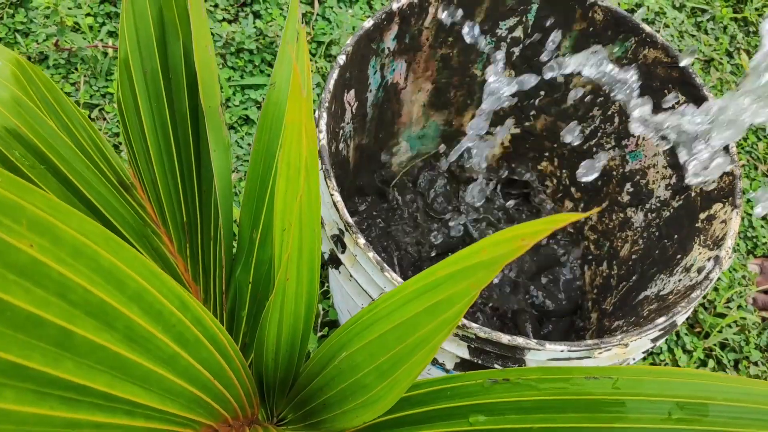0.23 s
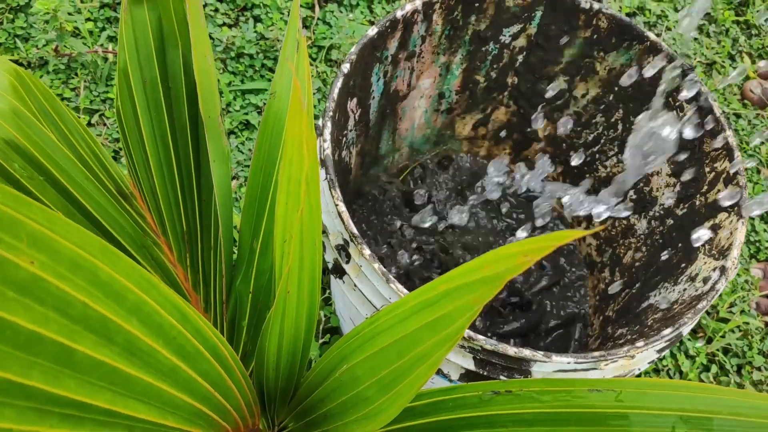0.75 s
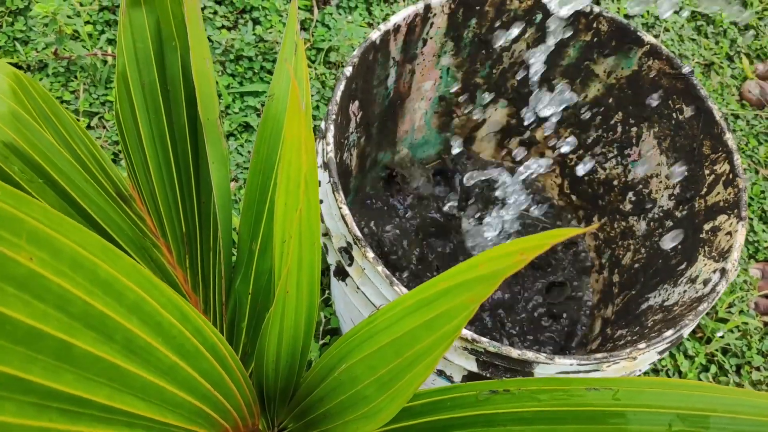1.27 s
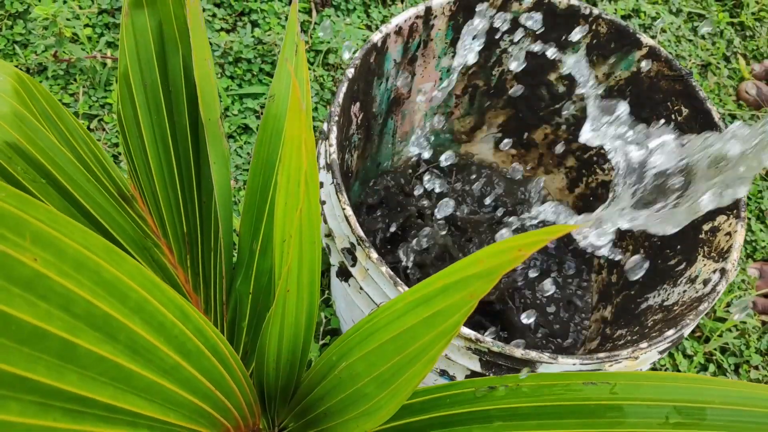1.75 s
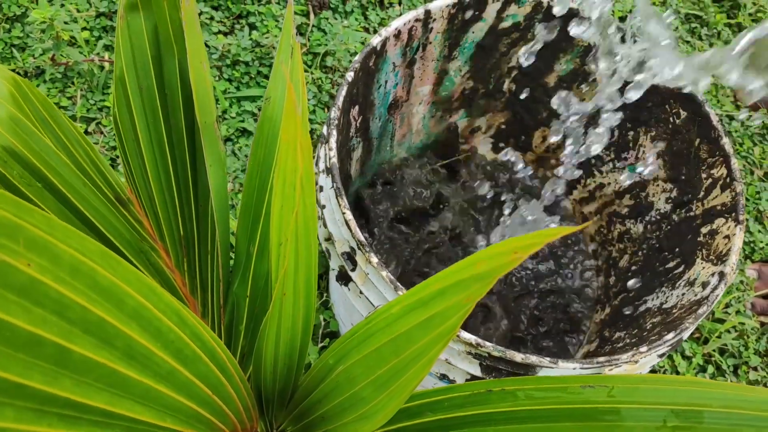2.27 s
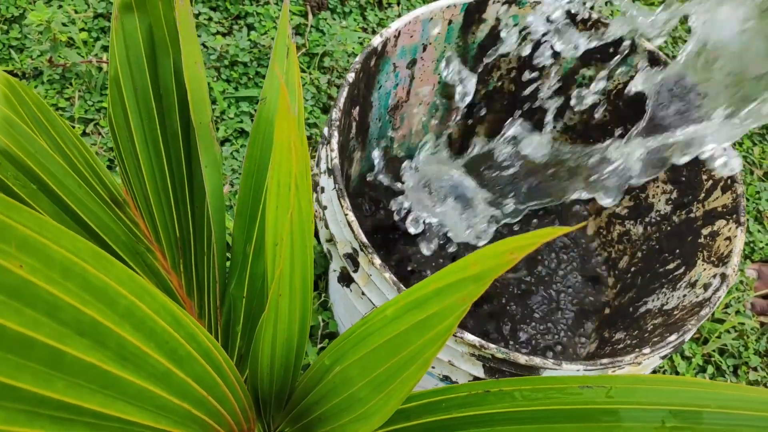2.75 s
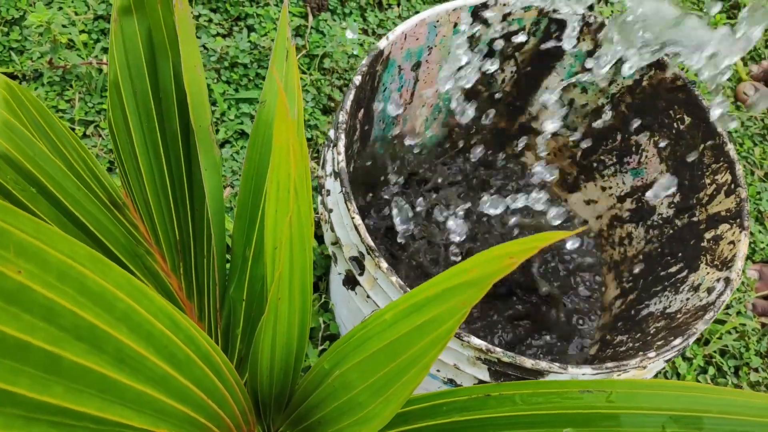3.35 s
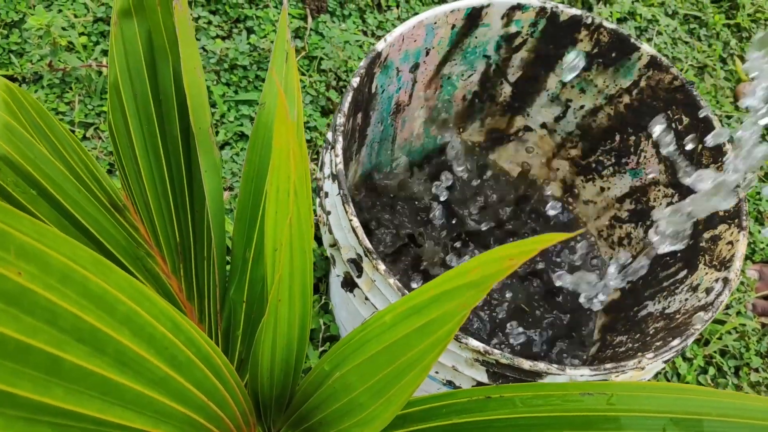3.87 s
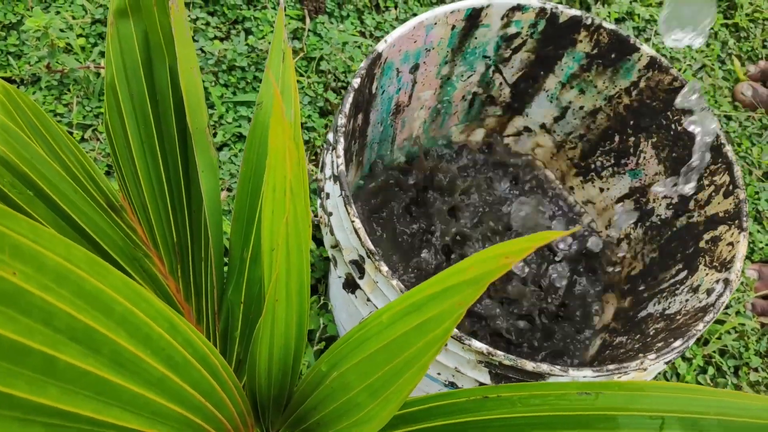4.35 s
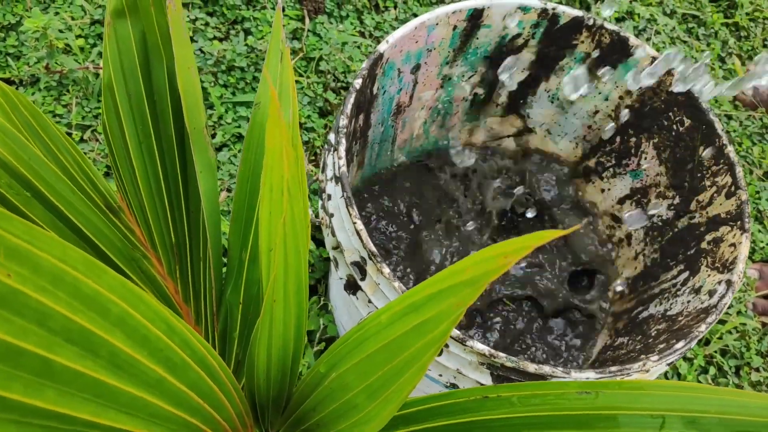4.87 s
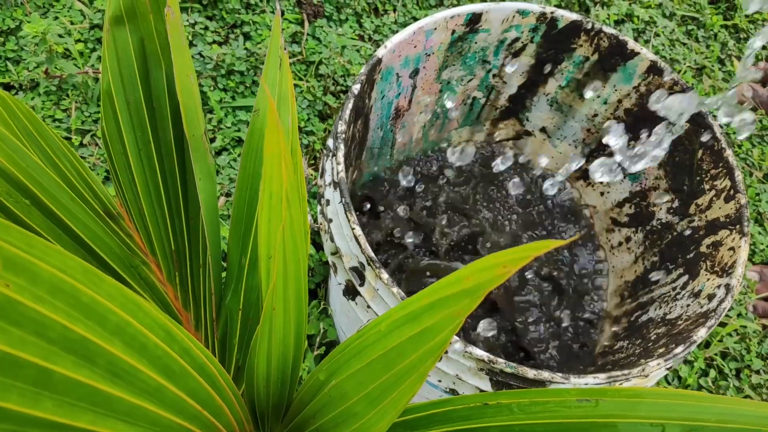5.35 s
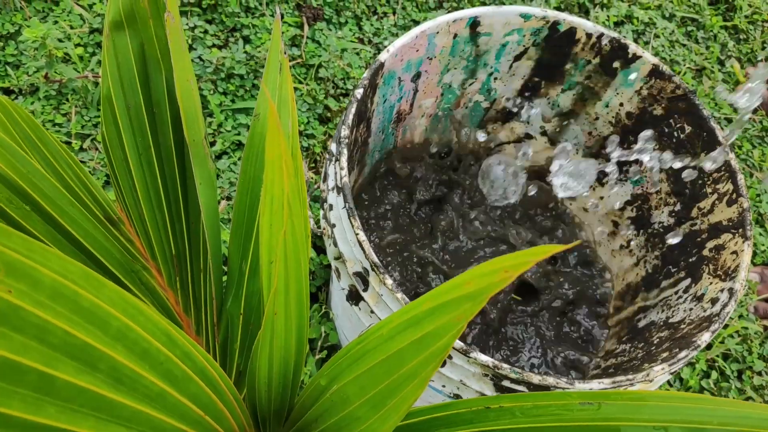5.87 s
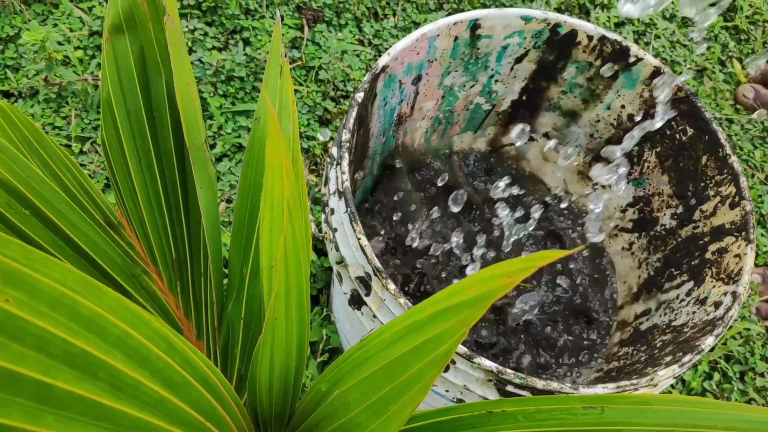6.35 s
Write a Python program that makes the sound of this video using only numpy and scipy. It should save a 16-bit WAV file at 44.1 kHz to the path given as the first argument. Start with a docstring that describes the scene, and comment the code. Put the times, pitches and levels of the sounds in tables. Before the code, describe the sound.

Close, bright splattering of a broken stream of water into a bucket, slapping and bubbling over a soft hollow resonance, with slight wind rumble.

```python
"""On a lawn, close to the microphone, water is poured from a height into a part-filled plastic bucket.
Lumps of the stream slap the wall and the pool: random clicks and tiny bubbles make bursts of spray.
The plunging water drives bubbles under, made as short tones that die away; a few ring out singly.
Blows on the water ring the air in the bucket, which sounds hollow and climbs in pitch as it fills.
A light breeze, made of low filtered noise, rumbles on the microphone in gusts."""
import sys
import numpy as np
from scipy import signal
from scipy.fft import rfft, irfft
from scipy.io import wavfile
from scipy.ndimage import uniform_filter1d

SR = 44100
rng = np.random.default_rng(int(sys.argv[2]) if len(sys.argv) > 2 else 0)


def transcribe(signal):
    """Save signal, clipped to [-1, 1], as a 16-bit WAV file at the path in sys.argv[1]."""
    frames = np.atleast_2d(signal).T
    limited = np.clip(frames, -1, 1)
    pcm = np.round(limited * 32767).astype(np.int16)
    wavfile.write(sys.argv[1], SR, pcm)


N = 291456
TIME = np.arange(N) / SR
EDGE_HZ = 15800  # upper edge of the sound

# gusts of wind: (time of the peak [s], half length [s], relative rumble [dB], relative eddies [dB])
GUSTS = [(0.282, .05, -44, -41), (0.566, 0.078, -41.5, -38), (0.78, 0.069, -43, -45),
         (1.196, 0.065, -51, -48), (1.377, .04, -42.5, -43), (1.595, 0.046, -45, -38.5),
         (1.958, 0.2, -45, -38), (2.493, 0.26, -44, -43), (2.998, 0.27, -46.5, -48),
         (4.4, 0.12, -46.5, -47.5), (4.624, 0.068, -39.5, -52), (5.823, 0.097, -45, -46.5),
         (6.146, 0.078, -38, -31), (6.42, 0.19, -45.5, -47.5)]
# colour of the deep rumble of the wind: (frequency [Hz], relative level [dB])
RUMBLE_COLOUR = [(10, -1.5), (55, -2), (80, -18), (1200, -77)]
# colour of the small eddies in the wind: (frequency [Hz], relative level [dB])
EDDY_COLOUR = [(30, -20), (58, 1.5), (100, -1), (160, -11), (260, -23), (1200, -69)]
# strength of the pour, against the usual flow: (time [s], level [dB])
FLOW = [(0, -3.5), (0.22, -5), (0.34, -3.5), (0.95, -4.5), (1.22, -1.5), (1.5, -3), (1.97, -6.5), (2.24, 2),
        (3.46, 1.5), (3.64, -3), (3.96, -.5), (4.3, -4), (4.62, -3.5), (4.85, 5.5), (5.12, -4),
        (5.55, -3.5), (5.94, 1), (6.6, -3)]
# moments when the stream breaks off: (time of the middle [s], half length [s])
BREAKS = [(0.118, 0.064), (1.61, 0.017), (1.83, 0.012), (3.062, 0.024), (3.227, 0.016), (3.664, 0.019),
          (4.122, 0.032), (4.289, 0.033), (5.085, 0.016), (5.235, 0.012), (5.461, 0.023), (5.682, 0.015),
          (6.06, 0.027), (6.441, 0.019), (6.515, 0.025)]
# the biggest lumps of water that land: (time [s], relative level [dB], length [s])
SPLASHES = [(0.009, -19.5, 0.028), (0.229, -16, 0.0039), (0.264, -16, 0.0048), (0.293, -16, 0.013),
            (0.33, -14, 0.0045), (0.405, -12.5, 0.0056), (0.518, -17.5, 0.016), (0.651, -21, 0.053),
            (0.72, -17, 0.01), (0.764, -14, 0.0056), (1.007, -16, 0.014), (1.082, -13.5, 0.0041),
            (1.118, -14.5, .018), (1.302, -15, 0.0059), (1.362, -17, 0.0083), (1.386, -8.5, 0.0046),
            (1.452, -18.5, .005), (1.523, -16.5, 0.012), (1.646, -22.5, 0.023), (1.775, -17, 0.014),
            (1.863, -17, 0.016), (1.907, -18, .007), (1.924, -18.5, 0.018), (2.035, -21.5, 0.04),
            (2.263, -19.5, 0.0083), (2.429, -19, 0.043), (2.725, -25, 0.037), (3.011, -18, 0.041),
            (3.164, -21.5, 0.04), (3.24, -26, .006), (3.289, -20.5, 0.06), (3.634, -14, 0.0051),
            (3.76, -18, 0.019), (3.859, -18, 0.017), (3.925, -17.5, 0.016), (4.232, -11, 0.0041),
            (4.413, -16, 0.0096), (4.539, -21.5, 0.046), (4.62, -18, 0.011), (4.682, -20, 0.036),
            (5.039, -14, .006), (5.107, -14, 0.0079), (5.195, -16, 0.012), (5.32, -23, 0.017),
            (5.39, -18, 0.018), (5.621, -18, 0.014), (5.687, -13.5, .007), (5.768, -8, 0.0041),
            (6.027, -11.5, 0.0052), (6.089, -18.5, 0.01), (6.181, -14.5, 0.0064), (6.399, -18.5, 0.011)]
# tones of the air column, halfway through: (frequency [Hz], width [Hz], relative level [dB])
AIR_MODES = [(334, 37, 2.5), (364, 84, 6), (457, 53, 0), (547, 93, 0), (920, 150, -28.5)]
# colour of the hollow ring as a whole: (frequency [Hz], relative level [dB])
HOLLOW_COLOUR = [(200, -16.5), (275, -14.5), (325, -1), (540, -1), (690, -9.5), (920, 11.5), (2000, -33)]
# large air pockets that close under the stream: (time [s], relative level [dB], pitch [Hz])
GLUGS = [(0.986, -36, 322), (1.385, -36, 364), (1.804, -34, 327), (2.468, -29, 345), (2.58, -32, 435),
         (3.028, -36, 354), (3.376, -25.5, 412), (3.482, -30, 440), (4.175, -27.5, 407), (4.857, -25, 356),
         (5.095, -32.5, 384), (5.429, -34, 390), (5.648, -29.5, 410), (5.752, -32.5, 394),
         (5.855, -29, 399), (6.35, -33, 400)]
# single bubbles that ring out: (time [s], relative level [dB], pitch [Hz])
BUBBLES = [(0.296, -24, 1750), (0.328, -15.5, 3670), (0.737, -30, 1400), (0.8, -29.5, 1190),
           (1.056, -20.5, 1610), (1.119, -21, 1860), (1.196, -24.5, 1800), (1.367, -14, 4500),
           (1.555, -26.5, 1580), (1.644, -16, 4520), (2.196, -23, 1710), (2.381, -15, 4770),
           (2.607, -23.5, 1600), (2.736, -24.5, 1950), (3.012, -23.5, 1980), (3.166, -16.5, 2080),
           (5.139, -18, 4940), (5.262, -27.5, 1100), (5.319, -16, 1570), (5.544, -15.5, 4800),
           (6.565, -23.5, 2180)]
# colour of the churning pool: (frequency [Hz], relative level [dB])
POOL_COLOUR = [(200, -42), (400, -28), (690, -5), (920, 1.5), (1150, -3), (1550, 1.5), (2250, -3.5),
               (2700, -9.5), (4500, -34)]
# colour of the spray as it leaves the bucket: (frequency [Hz], relative level [dB])
SPRAY_COLOUR = [(250, -17), (700, -23), (950, -11.5), (2000, -7.5), (2800, -16), (3500, -7), (4800, -4.5),
                (5800, -11), (6400, -2), (9300, -1), (10700, -6), (12200, 2.5), (14300, -9), (16000, -5.5)]

# between gusts: relative levels of the rumble and the eddies
CALM_DB, CALM_EDDIES_DB = -52, -62
# running level at the usual flow [dB], and dB gained per dB of flow
SPRAY_DB, SPRAY_GROWTH = -23, 0.25
POOL_DB, POOL_GROWTH = -36, 1.4
HOLLOW_DB, HOLLOW_GROWTH = -44.5, 1
# smaller lumps: pace, relative level, its spread either way, usual length
LUMPS_PER_S, LUMP_DB, LUMP_SPREAD_DB, LUMP_S = 16, -19, -1, 0.0054
# the stream thins before a big lump: depth at the usual flow, lead, half width
NECK_DB, NECK_LEAD_S, NECK_S = -2, 0.011, 0.011
NECK_HEALING = 0.082  # share of that depth lost per dB of flow
BREAK_DB = -6.5  # gain at the middle of a break
FILL_RISE = 0.061  # rise of the hollow ring as the bucket fills [octaves per second]


def amp(db):
    """Decibels to gain."""
    return 10 ** (np.asarray(db) / 20)


def unit(x):
    """Scales to rms 1."""
    return x / np.sqrt(np.mean(x ** 2) + 1e-20)


def add(mix, s, sound):
    """Mixes a sound in at time s."""
    part = mix[max(round(s * SR), 0):][:len(sound)]
    part += sound[:len(part)]


def hump(s, half_s):
    """A smooth swell in time that peaks at 1 at time s."""
    return np.exp(-np.minimum(((TIME - s) / half_s) ** 2, 20))


def colour(x, points, size=4096):
    """Filters without looking ahead, with the given balance of low and high; the result has rms 1."""
    hz, db = np.transpose(points)
    grid_hz = abs(np.fft.fftfreq(size, 1 / SR))
    level_db = np.interp(np.log(grid_hz + 1), np.log(hz), db)
    log_gain = np.log(amp(level_db))
    # this choice of phase puts the filter's energy as early as possible
    taps = np.fft.ifft(np.exp(np.conj(signal.hilbert(log_gain)))).real
    return unit(signal.oaconvolve(x, taps)[:N])


def flutter(top_hz):
    """Random wavering of rms 1, fading out above about top_hz."""
    hz = np.fft.rfftfreq(N, 1 / SR)
    spectrum = rfft(rng.standard_normal(N)) * np.exp(-(hz / top_hz) ** 2)
    return unit(irfft(spectrum, N))


def clumps(depth_db, top_hz):
    """Uneven gain of rms 1: things arrive in clusters."""
    return unit(amp(depth_db * np.minimum(flutter(top_hz), 2)))


def shared(x, span_s):
    """The water landing within span_s is a given amount, however the drops share it: local rms 1."""
    size = max(int(span_s * SR), 1)
    power = uniform_filter1d(uniform_filter1d(x ** 2, size), size)
    return x / np.sqrt(abs(power) + 1e-12)


def impacts(per_s, spread_db):
    """Random clicks of either sign: many small, a few large."""
    size = amp(spread_db * np.minimum(rng.exponential(1, N), 4))
    sign = rng.choice([-1, 1], N)
    return size * sign * (rng.random(N) < per_s / SR)


def bubble(hz, cycles, rise, swell):
    """A bubble swells, dies away over a few cycles and rises in pitch as it nears the surface."""
    age = np.arange(int(6 * cycles * SR / hz) + 2) * hz / SR  # in cycles
    envelope = (1 - np.exp(-age / swell)) * np.exp(-age / cycles)
    tone = np.sin(2 * np.pi * age * (1 + rise * age / cycles / 2))
    return envelope / envelope.max() * tone


def swarm(pitches, per_s, spread_db, cycles, rise, swell):
    """Many bubbles of the given pitches, born at random moments."""
    out = np.zeros(N)
    for hz in pitches:
        ring = bubble(hz, cycles * rng.uniform(.6, 1.4), rise, swell)
        births = impacts(per_s / len(pitches), spread_db)
        out += unit(signal.oaconvolve(births, ring)[:N])
    return unit(out)


def walls(x, wet_db, t60, count=60):
    """Quick reflections between bucket wall and water, which shift as the surface heaves."""
    t, out = np.arange(SR // 20) / SR, x.copy()
    turn = 2 * np.pi * TIME + flutter(top_hz=17.6)
    # two random echo patterns trade places
    for share in (np.sin(turn), np.cos(turn)):
        late = np.arange(len(t)) > count  # no echo in the first samples
        taps = rng.standard_normal(len(t)) * amp(-60 * t / t60) * late
        out += amp(wet_db) * signal.oaconvolve(x * share, taps / np.linalg.norm(taps))[:N]
    return out / np.hypot(1, amp(wet_db))


def breeze(rumble_db=3.5, buffet_db=1.0, lump_db=3.5):
    """Low turbulence at the microphone: a deep rumble, and small eddies that buffet it in gusts."""
    deep_power = np.full(N, amp(CALM_DB) ** 2)
    eddy_power = np.full(N, amp(CALM_EDDIES_DB) ** 2)
    for s, half_s, deep_db, eddies_db in GUSTS:
        gust = hump(s, half_s)
        deep_power += gust * amp(deep_db) ** 2
        eddy_power += gust * amp(eddies_db) ** 2
    rumble = colour(rng.standard_normal(N), RUMBLE_COLOUR, size=16384)
    eddies = colour(rng.standard_normal(N), EDDY_COLOUR, size=16384)
    eddies = shared(eddies * clumps(lump_db, top_hz=22), span_s=0.2)
    return amp(rumble_db) * np.sqrt(deep_power) * rumble + amp(buffet_db) * np.sqrt(eddy_power) * eddies


def flow():
    """Strength of the pour in dB, joined by straight lines in time."""
    return np.interp(TIME, *np.transpose(FLOW))


def unbroken():
    """Gain that dips wherever the stream breaks off."""
    return amp(BREAK_DB * sum(hump(s, half_s) for s, half_s in BREAKS))


def continuity(waver_db=1.5):
    """The stream wavers, and necks just ahead of each big lump, most deeply when the pour is thin."""
    necks = sum(hump(s - NECK_LEAD_S, NECK_S) for s, db, length in SPLASHES)
    neck_db = NECK_DB * necks * np.exp(-NECK_HEALING * flow())
    return amp(neck_db) * clumps(waver_db, top_hz=30)


def small_lumps():
    """The stream sheds smaller lumps at a loose pace between the big ones; longer ones land softer."""
    draws = rng.uniform(-1, 1, (200, 3))
    times = (np.arange(len(draws)) + .5 + .5 * draws[:, 0]) / LUMPS_PER_S
    stretch = 2 ** draws[:, 1]
    levels = LUMP_DB + LUMP_SPREAD_DB * draws[:, 2] - 10 * np.log10(stretch)
    big = np.transpose(SPLASHES)[0]
    clear_of_big = abs(times[:, None] - big).min(1) > .5 / LUMPS_PER_S
    return np.transpose([times, levels, LUMP_S * stretch])[clear_of_big & (times < N / SR)]


def splash_force(landings, attack_s=0.00073):
    """Each lump lands abruptly and is largely spent within its length; overlapping lumps add in power."""
    power, t = np.zeros(N), np.arange(SR // 5) / SR
    for s, db, length in landings:
        blow = amp(db) * (1 - np.exp(-t / attack_s)) * np.exp(-(t / length) ** 2)
        add(power, s, blow ** 2)
    return np.sqrt(power)


def hollow(force, steady_db=-23, clump_db=4.5, count=5):
    """Blows on the water ring the air column, which shortens and so climbs in pitch as the bucket fills."""
    strength = np.hypot(force, amp(steady_db)) * clumps(clump_db, top_hz=30)
    blows = impacts(per_s=450, spread_db=2.5) * strength
    t, rung = np.arange(SR // 8) / SR, np.zeros(N)
    # crossfade between a few stages of filling
    stages = np.linspace(0, TIME[-1], count)
    for s in stages:
        pitch = 2 ** (FILL_RISE * (s - TIME.mean()))
        ring = np.zeros(len(t))
        for hz, width, db in AIR_MODES:
            decay = np.sqrt(width) * np.exp(-np.pi * width * t)
            ring += amp(db) * decay * np.cos(2 * np.pi * hz * pitch * t)
        fade = np.maximum(1 - abs(TIME - s) / stages[1], 0)
        rung += signal.oaconvolve(blows * fade, ring)[:N]
    air = shared(colour(rung, HOLLOW_COLOUR), span_s=0.17)
    return amp(HOLLOW_DB + HOLLOW_GROWTH * flow()) * air


def plops(rows, level_db, cycles, rise, swell):
    """Single bubbles, each gliding up through its pitch."""
    out = np.zeros(N)
    for s, db, hz in rows:
        add(out, s, amp(db + level_db) * bubble(hz / (1 + rise), cycles, rise, swell))
    return out


def pool(force, stream, clump_db=6.5, froth_db=-8, plip_db=-4, lump_db=-21):
    """Stream and lumps churn up a crowd of short-lived bubbles; single fat drops plip among them."""
    crowd = swarm(np.linspace(850, 2700, num=22), per_s=1000, spread_db=2.6, cycles=2.7, rise=.08, swell=.6)
    plips = swarm(np.linspace(1000, 2200, num=10), per_s=60, spread_db=1.5, cycles=2, rise=.1, swell=1)
    froth = amp(froth_db) * rng.standard_normal(N)
    churn = (crowd + froth) * clumps(clump_db, top_hz=81.4) + amp(plip_db) * plips
    churn = colour(walls(churn, wet_db=-6, t60=.05), POOL_COLOUR)
    running = amp(POOL_DB + POOL_GROWTH * flow()) * np.sqrt(stream)
    return np.hypot(running, amp(lump_db) * force) * shared(churn, span_s=0.1)


def fizz(per_s=1400, spread_db=3.5, cycles=5, patch_db=3):
    """Tiny bubbles in five size classes, each class arriving in clusters of its own."""
    out = np.zeros(N)
    for pitches in np.split(np.geomspace(2700, 15900, num=30), 5):
        bubbles = swarm(pitches, per_s, spread_db, cycles, rise=0.045, swell=3.0)
        out += np.sqrt(pitches.mean()) * bubbles * clumps(patch_db, top_hz=167)
    return unit(out)


def spray(force, stream, splash_db=1.06, clump_db=3.0, burst_db=3, tick_db=-1.5, tinkle_db=-10, mist_db=-11):
    """Drops tick, tiny bubbles fizz and larger ones tinkle, driven by the stream and each splash."""
    ticks = unit(impacts(per_s=4500, spread_db=3.0))
    tinkles = swarm(np.geomspace(2100, 5200, num=14), per_s=110, spread_db=2, cycles=8, rise=.05, swell=1)
    mist = rng.standard_normal(N)
    grains = fizz() + amp(tick_db) * ticks + amp(tinkle_db) * tinkles + amp(mist_db) * mist
    grains = colour(walls(grains, wet_db=-16, t60=0.04), SPRAY_COLOUR)
    steady = shared(grains * clumps(clump_db, top_hz=153), span_s=0.24)
    running = amp(SPRAY_DB + SPRAY_GROWTH * flow()) * stream * steady
    # a splash throws up drops of its own: the same grains, shifted by a second
    thrown = np.roll(grains, SR)
    thrown = shared(thrown * clumps(burst_db, top_hz=310), span_s=0.0092)
    return running + amp(splash_db) * force * thrown


def scene():
    """The breeze, the ring of the bucket, the bubbles and the spray, summed."""
    whole = unbroken()
    force = np.hypot(splash_force(SPLASHES), whole * splash_force(small_lumps()))
    stream = whole * continuity()
    glugs = plops(GLUGS, level_db=1.5, cycles=2.9, rise=0.0086, swell=0.29)
    rings = plops(BUBBLES, level_db=4.5, cycles=3.7, rise=0.079, swell=0.74)
    rings = walls(rings, wet_db=-8, t60=0.055)
    mix = breeze() + hollow(force) + glugs + rings + pool(force, stream) + spray(force, stream)
    return mix[None]


def record(dry):
    """Rounds off the sharpest peaks, then removes the treble above EDGE_HZ."""
    rounded = dry / (1 + (dry / .85) ** 6) ** (1 / 6)
    low_pass = signal.firwin(601, EDGE_HZ, window=("kaiser", 9), fs=SR)
    return signal.oaconvolve(rounded, low_pass[None], "same")


dry = scene()
out = record(dry)
transcribe(out)
```